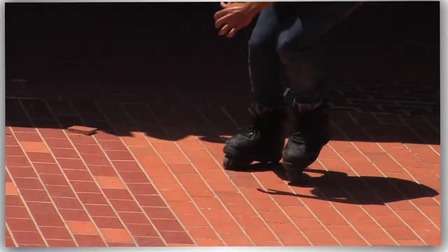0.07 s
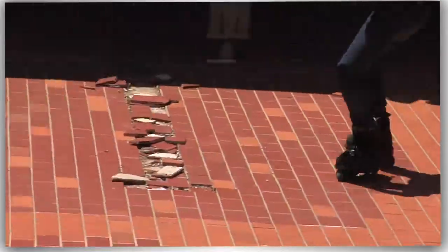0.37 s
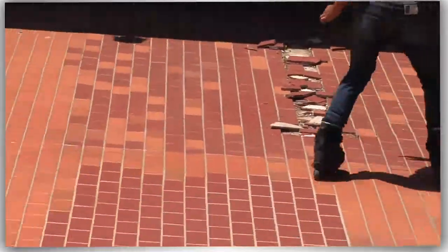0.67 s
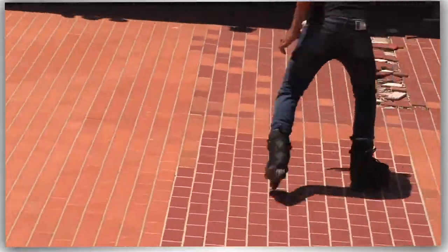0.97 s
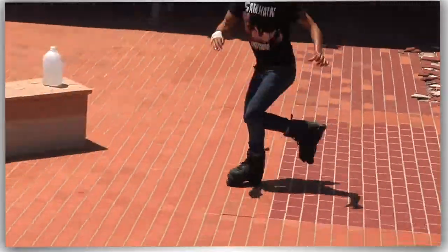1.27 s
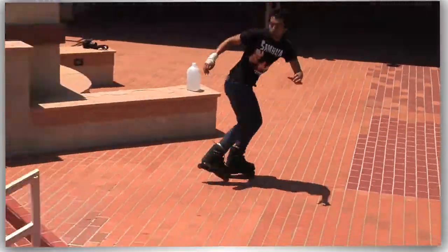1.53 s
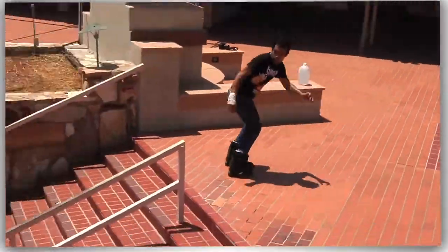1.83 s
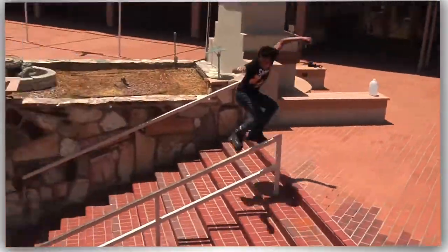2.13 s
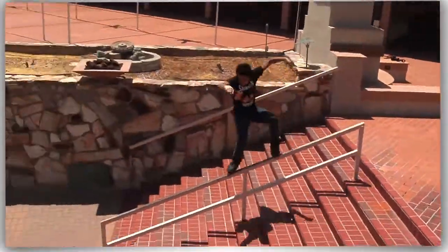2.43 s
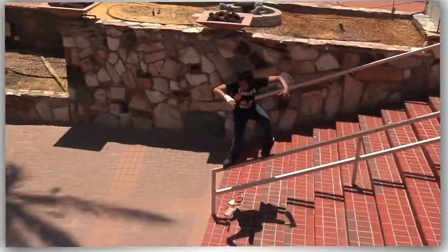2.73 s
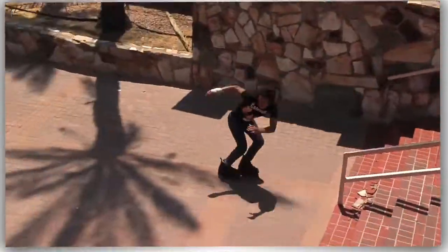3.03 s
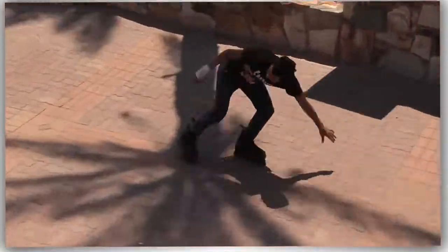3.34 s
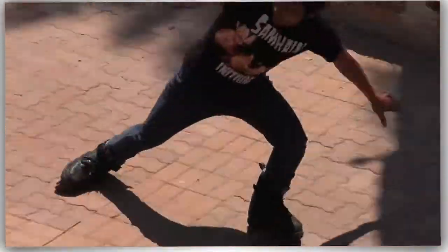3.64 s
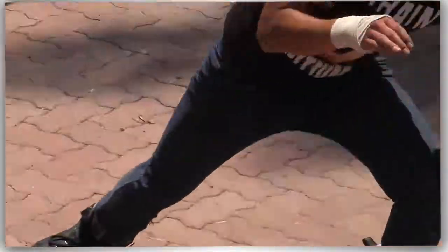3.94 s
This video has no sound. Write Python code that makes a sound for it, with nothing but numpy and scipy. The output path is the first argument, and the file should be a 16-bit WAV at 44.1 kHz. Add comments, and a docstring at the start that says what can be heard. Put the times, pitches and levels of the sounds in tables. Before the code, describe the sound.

Outdoors, inline skate wheels roll and click across brick, then hit a metal rail with a ringing grind. A heavy landing follows, and the wheels slap, squeak and rattle close by, with a short echo off the walls.

```python
"""A courtyard, open air. An inline skater rumbles and clacks over brick, jumps with the bearings
whirring, and clangs onto a steel handrail. Plastic soles stick and slip down it, droning through the
boots and exciting the steel, which rings on after they leave. The skates land with a thud on pavers,
one slaps down again and skids, and the wheels squeak and clatter past close by.
Walls and steps throw back a short, dark echo."""
import sys
import numpy as np
from scipy import signal
from scipy.fft import rfft, irfft
from scipy.io import wavfile
from scipy.ndimage import uniform_filter1d, minimum_filter1d

SR = 44100
rng = np.random.default_rng(int(sys.argv[2]) if len(sys.argv) > 2 else 0)


def to_wav(sig):
    """Store sig (one row per channel, or 1-D mono) as 16-bit WAV at the path in sys.argv[1].

    Samples outside -1..1 are clipped; the rate is SR.
    """
    pcm = np.clip(np.atleast_2d(sig), -1, 1) * 32767
    pcm = np.round(pcm).astype(np.int16)
    wavfile.write(sys.argv[1], SR, pcm.T)  # frames by channels


N = 176400
JUMP_S, GRIND_ON_S, GRIND_OFF_S = 2.07, 2.365, 3.06


def amp(db):
    """Decibels to gain."""
    return 10 ** (np.asarray(db) / 20)


def unit(x):
    """Scales to rms 1."""
    return x / np.sqrt(np.mean(x ** 2) + 1e-20)


def read(points, hz):
    """Reads a curve on a log-frequency axis."""
    f, value = np.transpose(points)
    return np.interp(np.log(hz + 1), np.log(f + 1), value)


def add(mix, s, sound):
    """Drops a sound into the mix at time s."""
    part = mix[max(round(s * SR), 0):][:len(sound)]
    part += sound[:len(part)]


def colour(x, eq):
    """Minimum-phase EQ of unit energy: the curve sets only the tone."""
    hz = abs(np.fft.fftfreq(4096, 1 / SR))
    log_gain = np.log(amp(np.maximum(read(eq, hz), -100)))
    taps = np.fft.ifft(np.exp(np.conj(signal.hilbert(log_gain)))).real[:2048]
    return signal.oaconvolve(x, taps / np.linalg.norm(taps))[:len(x)]


def faders(curve, on_s, off_s, release_s=0.034):
    """One gated gain envelope for each level column of a curve."""
    t = np.arange(N) / SR
    times, *levels = np.transpose(curve)
    gate = np.clip((t - on_s) / 0.0048, 0, 1) * np.clip((off_s - t) / release_s + 1, 0, 1)
    return [gate * amp(np.interp(t, times, db)) for db in levels]


def grains(per_s, spread_db, smooth):
    """Tiny impacts of uneven size over a smooth rub."""
    size = amp(spread_db * np.minimum(rng.exponential(1, N), 3.5))
    clicks = size * rng.choice([-1., 1.], N) * (rng.random(N) < per_s / SR)
    return unit(unit(clicks) + smooth * rng.standard_normal(N))


def drift(per_s):
    """Smooth random modulator of rms 1."""
    lowpass = np.exp(-(np.fft.rfftfreq(N, 1 / SR) / per_s) ** 2)
    return unit(irfft(rfft(rng.standard_normal(N)) * lowpass, N))


def shifting(x, depth_db, width_hz, hold_s):
    """Resonances come and go as the contact moves."""
    z = signal.stft(x, SR, nperseg=1024, noverlap=768)[2]
    across = np.fft.fftfreq(z.shape[0], SR / 1024)[:, None]
    along = np.fft.fftfreq(z.shape[1], 256 / SR)
    blur = np.exp(-(across * width_hz) ** 2 - (along * hold_s) ** 2)
    patches = unit(np.fft.ifft2(np.fft.fft2(rng.standard_normal(z.shape)) * blur).real)
    return unit(signal.istft(z * amp(depth_db * patches), SR, nperseg=1024, noverlap=768)[1][:N])


# Tone of the outdoor bed (f/Hz, level/dB). Levels in all tables are relative.
AIR_EQ = [(20, 0), (50, -1.5), (130, 5), (300, -6), (550, -12), (900, -26.5), (2000, -33.5), (3500, -33),
          (5500, -39), (7500, -38), (10000, -41.5), (16000, -43)]


def open_air():
    """A steady, bass-heavy bed of outdoor noise."""
    return amp(-33) * unit(colour(rng.standard_normal(N), AIR_EQ))


# Fader ride of the wheels on brick (t/s, rumble level/dB, grit level/dB)
BRICK_RIDE = [(0, -27, -41), (.14, -33, -53), (.24, -33, -55), (.3, -32, -49), (.4, -31, -51),
              (.5, -29, -45), (.66, -28, -45), (.75, -24, -39), (.96, -27, -39), (1.1, -30, -41),
              (1.3, -28, -47), (1.42, -22, -48), (1.48, -34, -50), (1.6, -35, -49), (1.65, -26, -42),
              (1.8, -24, -45), (1.9, -26, -41), (2.05, -29, -44)]
# Low body and gritty top of that roll (f/Hz, level/dB)
BRICK_RUMBLE_EQ = [(29, -31), (50, -14.5), (81, -18), (125, -11), (167, -2.5), (201, -2.5), (262, -3),
                   (340, -15.5), (443, -6.5), (508, -9), (808, -21), (1000, -26), (1300, -18), (2200, -120)]
BRICK_GRIT_EQ = [(470, -33.5), (800, -10.5), (988, 4), (1200, -15), (1380, -5.5), (1790, -7.5),
                 (2240, -5.5), (4010, -13.5), (5610, -21.5), (7370, -19), (9440, -34), (10400, -27.5),
                 (15500, -43)]


def brick_roll():
    """Wheels rumble and crackle over brick; in the air only their bearings whirr."""
    t, crossfade_s = np.arange(N) / SR, 0.066
    rumble = unit(colour(grains(per_s=300, spread_db=4, smooth=0.71), BRICK_RUMBLE_EQ))
    grit = unit(colour(grains(per_s=500, spread_db=4, smooth=1.0), BRICK_GRIT_EQ))
    rumble_gain, grit_gain = faders(BRICK_RIDE, on_s=-1, off_s=JUMP_S, release_s=crossfade_s)
    airborne = np.clip((t - JUMP_S) / crossfade_s, 0, 1) * (t < GRIND_ON_S)
    whirr = amp(-48.5) * unit(colour(rng.standard_normal(N), BRICK_GRIT_EQ)) + amp(-50.5) * rumble
    return airborne * whirr + amp(-4) * rumble_gain * rumble + amp(-0.5) * grit_gain * grit


# One downward glide (t/s, length/s, start f/Hz, end f/Hz)
WHISTLE = (.065, .085, 5600, 3900)


def whistle():
    """A thin, faint falling whistle."""
    start, length, from_hz, to_hz = WHISTLE
    progress, out = np.arange(0, length, 1 / SR) / length, np.zeros(N)
    phase = 2 * np.pi * np.cumsum(from_hz + (to_hz - from_hz) * progress) / SR
    add(out, start, amp(-58) * np.sin(np.pi * progress) * np.sin(phase))
    return out


# Modes of the wheel frame (f/Hz, level/dB)
FRAME_MODES = [(1000, -0.5), (1370, -3), (1750, -6.5)]
# Bright snap of a wheel's tick (f/Hz, level/dB)
TICK_EQ = [(300, -6.5), (1200, -9), (2200, 3.5), (3500, 2), (4500, -8.5), (5600, -16), (7500, -11),
           (9500, -24), (15000, -31)]


def knock(tick_db, clack_db, shell_db, thump_db, thump_hz):
    """One layered hit: the boot thumps, its shell knocks, the frame clacks and the wheels tick."""
    t = np.arange(4096) / SR
    noise, detune = rng.standard_normal(len(t)), rng.uniform(-1.075, 1, 1 + len(FRAME_MODES))
    thump = (1 - np.exp(-t / .0034)) * np.exp(-t / .0081) * np.sin(2 * np.pi * thump_hz * t)
    shell_hz = 529 * (1 + .12 * detune[0])
    shell = (1 - np.exp(-t / .0012)) * np.exp(-t / .0053) * np.sin(2 * np.pi * shell_hz * t)
    clack = np.exp(-t / .0036) * sum(amp(db) * np.sin(2 * np.pi * (hz * (1 + .06 * d) * t + d))
                                     for (hz, db), d in zip(FRAME_MODES, detune[1:]))
    tick = colour(noise * (np.exp(-t / .0022) + .11 * np.exp(-t / .013)), TICK_EQ)  # snap, then rattle
    transient = (1 - np.exp(-t / .00055)) * (amp(clack_db + 2) * clack + amp(tick_db - 5) * tick)
    return amp(thump_db + 9.5) * thump + amp(shell_db + 9) * shell + transient


# Skate hits (t/s, tick level/dB, clack level/dB, shell level/dB, thump level/dB, thump f/Hz)
HITS = [(0.245, -26, -30, -44, -24.5, 252), (0.4643, -24.5, -31, -25.5, -35, 225),
        (0.5438, -17.5, -35, -26, -39, 205), (0.6424, -30, -36, -29, -21, 156),
        (0.6848, -47, -52, -30, -14, 215), (0.7018, -31, -21, -19, -19, 216),
        (0.7166, -37, -29, -26, -18, 131), (0.7917, -42, -27, -25, -32, 270),
        (0.9444, -24, -28.5, -21.5, -17.5, 267), (1.0159, -23, -33, -26.5, -35, 235),
        (1.1669, -16, -16, -19.5, -32, 121), (1.2063, -21.5, -29, -18.5, -17.5, 188),
        (1.222, -24, -22, -47, -48, 183), (1.2617, -28.5, -30, -41, -22, 167),
        (1.3371, -38, -45, -22, -23.5, 131), (1.4008, -42, -51, -25, -16, 200),
        (1.4334, -34, -38, -21, -28, 272), (1.5404, -33, -59, -25.5, -28.5, 250),
        (1.6314, -17, -27, -21.5, -21, 235), (1.655, -24, -33, -22, -14.5, 165),
        (1.7113, -30, -31, -24, -10.5, 160), (1.7398, -32, -31, -29, -12.5, 176),
        (1.7718, -44, -49, -31, -16, 172), (1.8055, -37, -48, -34, -13.5, 156),
        (1.9154, -25, -25, -26, -38, 119), (1.952, -18.5, -24, -30, -36, 159),
        (2.0115, -31, -49, -22, -18.5, 214), (2.3629, -20, -23, -12, -20, 172),
        (2.367, -5, -12, -11.5, -17, 187), (2.3831, -14, -12.5, -34, -22, 164),
        (2.4643, -21, -19, -25, -25.5, 167), (3.0615, -17, -18, -14, -8.5, 231),
        (3.0686, -4.5, -9.5, -18, -7.5, 112), (3.0788, -1.5, -13, -11, -6, 269.6),
        (3.0915, -4, -17, -10, -13, 258), (3.1224, -18, -24, -32, -36, 250),
        (3.1624, -27, -23, -25, -23, 267), (3.251, -26, -25, -19, -24.5, 248),
        (3.313, -19, -24.5, -17, -21, 262), (3.352, -20.5, -36, -18.5, -20, 168.4),
        (3.5643, -21, -24, -18.5, -16, 187), (3.592, -3.5, -10, -16, -20, 276),
        (3.6002, 3.5, -20, -4, -14, 188), (3.617, 3.5, -17, -12, -25, 186),
        (3.6365, -17, -13, -13, -19, 186), (3.6574, -0.5, -16, -6.5, -14, 207),
        (3.706, -6.5, -21, -35, -24, 268), (3.7454, -16, -22, -16.5, -22, 303),
        (3.7842, -20, -20, -32, -29, 280), (3.8573, -12, -22, -35, -22.5, 226),
        (3.9271, -15, -19, -23, -24, 205), (3.9743, -11, -26, -28, -23, 284)]


def clatter():
    """The skates strike paving and rail: strides, joints and landings."""
    out = np.zeros(N)
    for s, *layers in HITS:
        add(out, s, knock(*layers))
    return out


# Fader ride of the soles on the rail (t/s, then level/dB of drone, scrape, rasp, hiss)
GRIND_RIDE = [(2.375, -15.5, -18.5, -20, -32), (2.385, -16, -16, -24, -42), (2.415, -21, -27.5, -30.5, -49),
              (2.443, -26, -41, -30, -48), (2.471, -27, -29, -30, -50), (2.495, -28.5, -43, -37, -53),
              (2.545, -30, -53, -41, -43), (2.563, -44, -31, -30, -48), (2.577, -31, -40, -35.5, -48),
              (2.741, -28, -29.5, -32, -40.5), (2.753, -32, -35, -29.5, -41),
              (2.813, -29.5, -25, -23.5, -36.5), (2.831, -20.5, -23.5, -23, -30),
              (2.857, -28, -24, -27.5, -32), (2.895, -19, -12, -8, -20.5), (2.939, -29.5, -20.5, -19, -48),
              (3.005, -26, -37, -32.5, -49), (3.04, -45, -34, -42, -73)]
# The four bands of the grind, low to high (f/Hz, level/dB)
DRONE_EQ = [(59, -41), (100, -8), (157, -10.5), (221, -22), (284, 2), (369, -14.5), (627, -1), (831, -6.5),
            (1100, -7.5), (1430, -15), (2420, -120)]
SCRAPE_EQ = [(530, -24), (900, -28), (1220, -6), (1590, -4), (1790, 1.5), (2110, -15), (2200, -9),
             (2860, -29), (4840, -120)]
RASP_EQ = [(1290, -26), (2200, -4), (2560, -1.5), (2780, -5), (3280, -3.5), (3640, -5.5), (4020, -11.5),
           (4460, -11.5), (5600, -25), (7280, -46), (12300, -120)]
HISS_EQ = [(3180, -29), (5400, -16), (5590, -10.5), (7260, -1), (7960, -6.5), (8660, -18), (10000, -14.5),
           (11700, -28), (15500, -34)]


def grind():
    """Dense slips of plastic on steel sound through the boot and keep the rail ringing."""
    slips = grains(per_s=2500, spread_db=3.5, smooth=0.7)
    slips = shifting(slips, depth_db=3, width_hz=145, hold_s=0.065)
    drone, scrape, rasp, hiss = faders(GRIND_RIDE, GRIND_ON_S, GRIND_OFF_S)
    bands = [(drone, DRONE_EQ), (scrape, SCRAPE_EQ), (rasp, RASP_EQ), (hiss, HISS_EQ)]
    boot = sum(gain * unit(colour(slips, eq)) for gain, eq in bands)
    return amp(-1.5) * boot + rail(force=scrape)


# Modes of the steel handrail (f/Hz, level/dB)
RAIL_MODES = [(285.3, -38), (640.6, -36), (958.2, -43), (1082, -39), (1217, -38), (1260, -40), (1362, -37),
              (1491, -40), (1685, -38), (1750, -36), (1771, -34), (1836, -35), (1922, -39), (2008, -38),
              (2245, -36), (2304, -34), (2627, -42), (2686, -33), (2789, -38), (2837, -40), (3063, -41),
              (3591, -39), (3736, -43), (4296, -49)]


def rail(force):
    """The steel clangs as the skates hit, then each mode stores energy from the rub and rings on."""
    t, ring, clang = np.arange(N) / SR, np.zeros(N), np.zeros(N)
    since_hit = np.maximum(t - GRIND_ON_S, 0)
    clang_t60_s = 0.16  # choked by the skates standing on the rail
    for hz, db in RAIL_MODES:
        ring_t60_s = .95 * (1500 / hz) ** .8
        retained = amp(-60 / (SR * ring_t60_s)) ** 2  # share of energy left after one sample
        swell = np.sqrt(signal.lfilter([1 - retained], [1, -retained], force ** 2))
        phase = 2 * np.pi * (hz * t + rng.random())
        shimmer = 0.61 * drift(per_s=21) * np.sin(phase + 2 * drift(per_s=5.8))
        ring += amp(db) * swell * (np.sin(phase) + shimmer)
        tilt_db = 1.5 * np.log2(hz / 1500)
        decay = amp(db + tilt_db - 60 * since_hit / clang_t60_s)
        clang += decay * np.sin(phase + 2 * np.pi * rng.random())
    attack = np.minimum(since_hit / 0.0017, 1)
    return amp(-33) * unit(ring) + amp(8.5) * attack * clang


# Fader ride of the wheels on pavers (t/s, rumble level/dB, grit level/dB)
PAVER_RIDE = [(3.12, -18, -31.5), (3.246, -23, -38), (3.366, -16.5, -31), (3.53, -25, -39.5),
              (3.58, -23, -36), (3.596, -17, -18), (3.736, -20, -23.5), (3.852, -22.5, -34.5),
              (3.86, -25, -28), (3.884, -23.5, -34.5), (3.994, -26.5, -34.5), (4.0, -18, -21)]
# Low body and gritty top of that roll (f/Hz, level/dB)
PAVER_RUMBLE_EQ = [(29, -32), (50, -24), (87, -6.5), (225, -1), (275, 1), (386, -3.5), (471, -1),
                   (508, -1.5), (548, -1.5), (591, -5), (839, -17), (1000, -9.5), (1300, -22), (2200, -120)]
PAVER_GRIT_EQ = [(470, -48), (800, -4.5), (1060, 0.5), (1200, -0.5), (1730, -0.5), (1880, -6), (2300, -1),
                 (3630, -7.5), (5680, -19), (7640, -18), (9440, -31), (11000, -28.5), (15500, -63)]


def paver_roll():
    """Wheels roll and skid over rough pavers; the grit leads in under the end of the grind."""
    rumble = unit(colour(grains(per_s=250, spread_db=3, smooth=0.64), PAVER_RUMBLE_EQ))
    crackle = grains(per_s=1700, spread_db=3.5, smooth=0.67)
    grit = unit(colour(shifting(crackle, depth_db=3.5, width_hz=310, hold_s=0.014), PAVER_GRIT_EQ))
    rumble_gain, _ = faders(PAVER_RIDE, on_s=3.065, off_s=4.2)
    _, grit_gain = faders(PAVER_RIDE, on_s=2.8, off_s=4.2)
    return amp(-2.5) * rumble_gain * rumble + amp(1) * grit_gain * grit


# Low end of the landing (t/s, level/dB, f/Hz, decay/s)
LANDING_THUDS = [(3.060, -14, 245, .035), (3.072, -10, 94, .035)]


def landing():
    """The skater's weight comes down in soft-edged, damped low tones."""
    out, t = np.zeros(N), np.arange(SR // 2) / SR
    for s, db, hz, decay_s in LANDING_THUDS:
        envelope = (1 - np.exp(-t / 0.0059)) * np.exp(-t / decay_s)
        add(out, s, amp(db) * envelope * np.sin(2 * np.pi * hz * t))
    return out


# Wheel squeaks in the skid (t/s, length/s, f/Hz, level/dB)
WHEEL_SQUEAKS = [(3.722, 0.013, 1623, -11.5), (3.779, 0.012, 2890, -16.5), (3.79, 0.0074, 2820, -25),
                 (3.828, .012, 2220, -21.5), (3.855, 0.0068, 2270, -13), (3.866, .01, 2400, -19),
                 (3.926, 0.0052, 2250, -17), (3.973, 0.0061, 2200, -17)]


def squeaks():
    """Brief, rough stick-slip tones as the wheels slide sideways."""
    out, jitter = np.zeros(N), 0.079 * drift(per_s=700)
    for s, length, hz, db in WHEEL_SQUEAKS:
        pitch = hz * (1 + jitter[round(s * SR):][:round(length * SR)])
        add(out, s, amp(db) * np.hanning(len(pitch)) * np.sin(2 * np.pi * np.cumsum(pitch) / SR))
    return out


# Reverb time of the courtyard (f/Hz, T60/s)
YARD_DECAY = [(100, 1), (500, 0.59), (2000, 0.41), (5000, 0.25), (12000, 0.26)]


def courtyard(x):
    """Scattered echoes from walls and steps, the treble dying first."""
    after_predelay = np.arange(SR) > .006 * SR
    echoes = rng.standard_normal(SR) * (rng.random(SR) < 2500 / SR) * after_predelay
    hz, t, z = signal.stft(echoes, SR, nperseg=256)
    tail = signal.istft(z * amp(-60 * t / read(YARD_DECAY, hz)[:, None]), SR)[1]
    return signal.fftconvolve(x, tail / np.linalg.norm(tail))[:N]


def scene():
    """Mono mix: the action and its courtyard reverb over the outdoor bed."""
    direct = clatter() + brick_roll() + grind() + paver_roll() + landing() + squeaks() + whistle()
    return (direct + open_air() + amp(-13) * courtyard(direct))[None]


def record(dry):
    """Master chain: low cut, a fast limiter at full scale, then a steep high cut."""
    x = signal.sosfilt(signal.butter(1, 30, "highpass", fs=SR, output="sos"), dry)
    gain = uniform_filter1d(minimum_filter1d(1 / np.maximum(abs(x), 1), size=41), size=41)
    high_cut = signal.firwin(511, 15780, window=("kaiser", 9), fs=SR)
    return signal.oaconvolve(x * gain, high_cut[None], "same")


dry = scene()
out = record(dry)
to_wav(out)
```